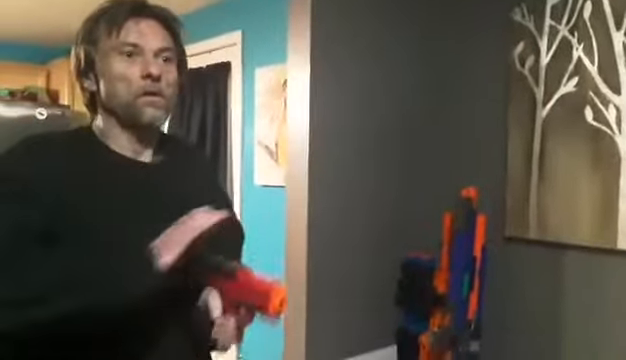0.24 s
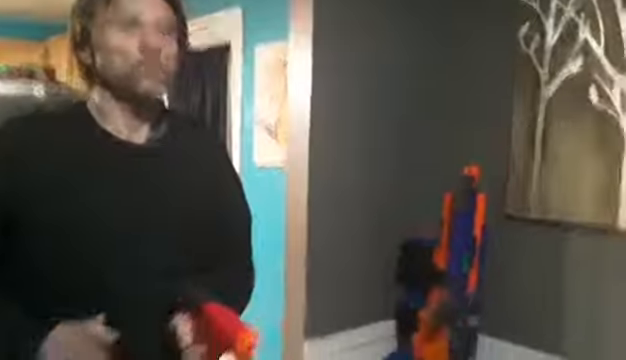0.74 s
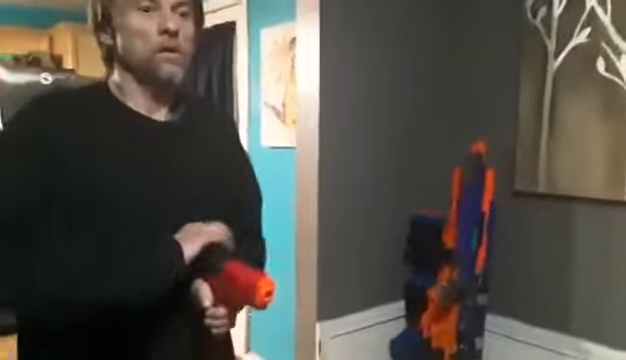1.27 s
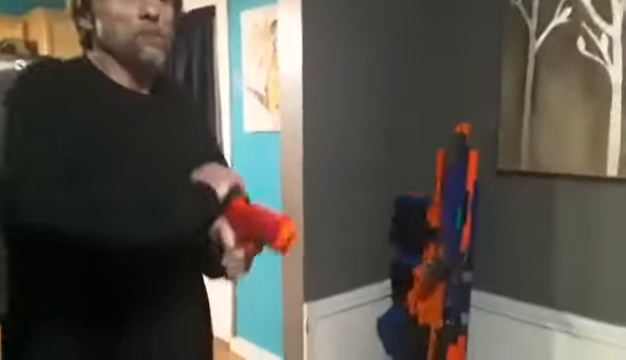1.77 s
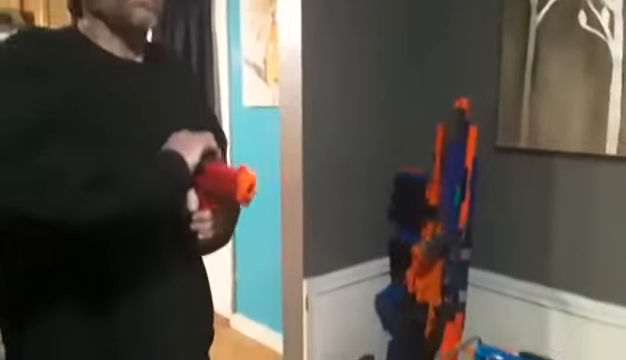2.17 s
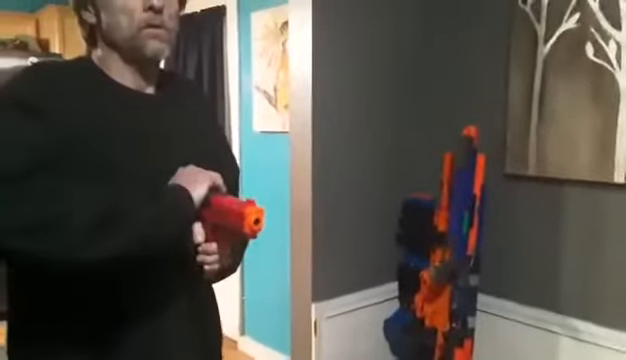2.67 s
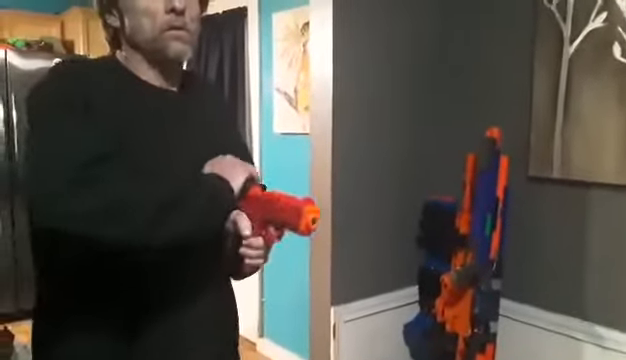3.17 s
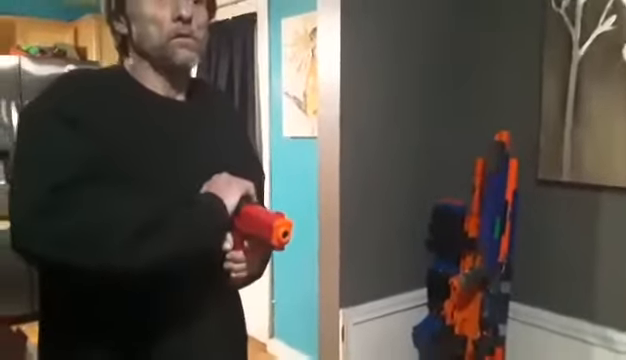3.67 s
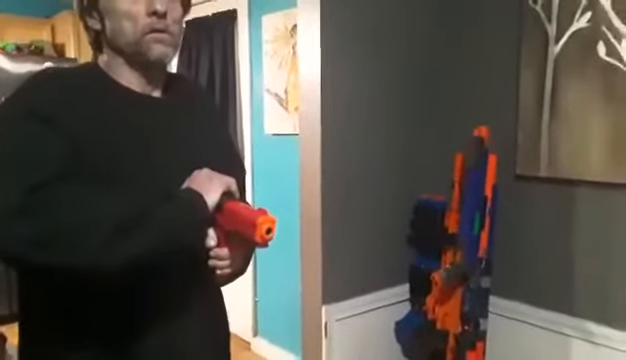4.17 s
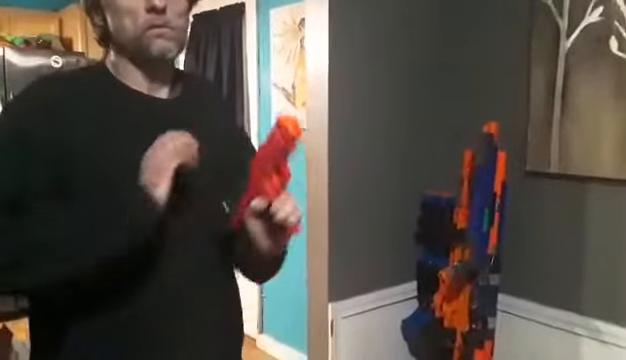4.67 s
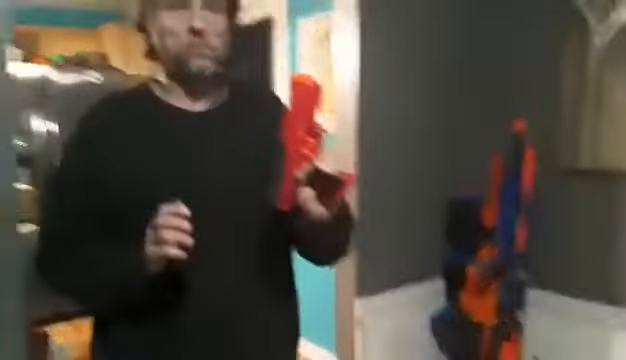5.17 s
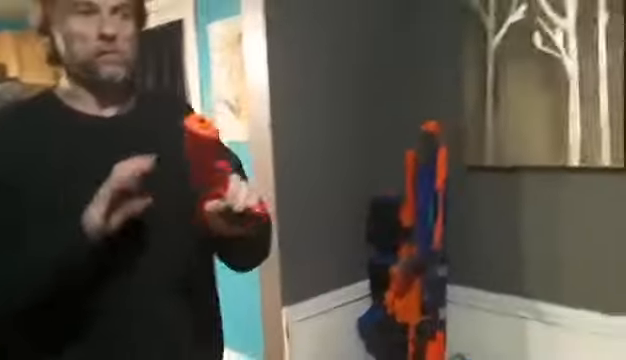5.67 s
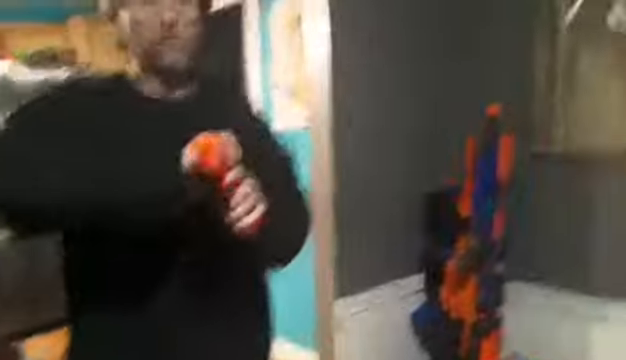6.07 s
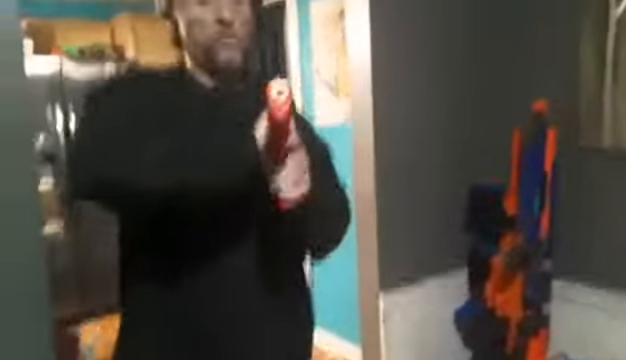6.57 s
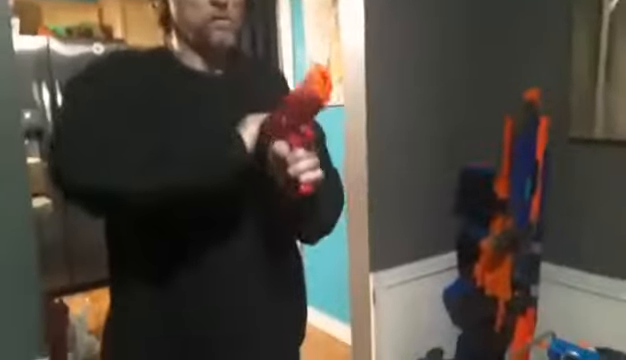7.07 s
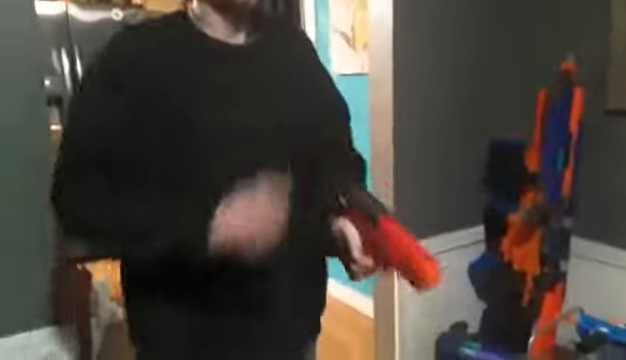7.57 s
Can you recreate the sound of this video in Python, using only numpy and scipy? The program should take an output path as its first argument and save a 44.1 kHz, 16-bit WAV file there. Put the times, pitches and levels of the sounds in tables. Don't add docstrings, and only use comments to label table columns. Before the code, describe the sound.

In a small, hard, lively room, a plastic dart pistol close to the microphones is cocked with a sharp double clack, then fires with a hollow pop and puff of air. It is cocked and fired twice more, darts thudding across the room. Later come dry finger ticks on the camera, more slide clacks and one very loud snap. A faint low hum swells and sinks.

```python
import sys
import numpy as np
from scipy import signal
from scipy.io import wavfile
from scipy.ndimage import uniform_filter1d

SR = 44100
rng = np.random.default_rng(int(sys.argv[2]) if len(sys.argv) > 2 else 0)


def pcm_store(signal):
    levels = np.round(np.clip(np.atleast_2d(signal), -1, 1) * 32767)
    wavfile.write(sys.argv[1], SR, levels.astype(np.int16).T)


def natural_amplitude(level_db):
    exponent = np.asarray(level_db, float) / 20
    return 10 ** exponent


N = 344862


def evened(x):
    return x / np.sqrt(np.mean(x ** 2) + 1e-20)


def read(points, hz):
    f, value = np.transpose(points)
    return np.interp(np.log(hz + 1), np.log(f + 1), value)


def add(mix, s, sound):
    part = mix[..., round(s * SR):][..., :sound.shape[-1]]
    part += sound[..., :part.shape[-1]]


def colour(points, tilt_db=0., modes=()):
    hz = np.abs(np.fft.fftfreq(4096, 1 / SR))
    db = read(points, hz) + tilt_db * np.log2(np.clip(hz, 300, 12000) / 3000)
    for f, width, top in modes:
        db = db + top / (1 + (2 * (hz - f) / width) ** 2)
    log_gain = np.log(natural_amplitude(np.maximum(db, -100)))
    h = np.fft.ifft(np.exp(np.conj(signal.hilbert(log_gain)))).real[:2048]
    return h / np.linalg.norm(h)


def resonate(x, hz, width):
    return signal.lfilter(*signal.iirpeak(hz, hz / width, SR), x)


def blow(db, tilt_db, ms, points, modes):
    t = np.arange(1200) / SR
    fade = np.exp(-t * 1000 / max(ms, .2)) * np.minimum(t / 0.0004, 1)
    contact = rng.standard_normal(1200) * fade
    contact[12] += .4 * np.linalg.norm(contact)
    body = colour(points, tilt_db, modes)
    sound = np.convolve(contact, body)
    around = np.pad(body, (12, len(sound) - len(body) - 12)) * np.linalg.norm(sound)
    return natural_amplitude(db) * np.array([sound, around]) / abs(sound).max()


# frequency in Hz, level in dB per Hz.
SHELL = [(88, -46.5), (150, -19), (327, -9), (659, -12), (828, -5), (2590, -4), (3710, -3), (11100, -15.5),
         (13000, -23.5), (14000, -55)]
POP_S = [.6186, 2.3758, 3.6876]
# pop in dB, air rush in dB, rush length in seconds,
# frequency in Hz below which the pop fades out.
SHOTS = [
    (-10.5, -10, 0.047, 54),
    (-5.5, -13, 0.055, 66),
    (-3, -9, 0.026, 240),
]
PIPE_DB = [.5, 2.5, 0.5, -4, -8, -14]
# frequency in Hz, level in dB per Hz.
RUSH = [(88, -50), (150, -20), (566, -20), (698, -8), (1330, -16.5), (3640, -10.5), (9950, -11),
        (11800, -28.5), (14000, -80)]
# frequency in Hz, width in Hz, height in dB.
PLUNGER = [(483, 68, 2.5), (1180, 220, 2), (3130, 610, 6), (4650, 160, 6), (8200, 130, 1.5)]


def shots():
    out = np.zeros((2, N))
    pipe_hz, pipe_width_hz = 714, 58
    for s, (pop_db, rush_db, length, low_hz) in zip(POP_S, SHOTS):
        t = np.arange(round(.022 * SR)) / SR
        catch = np.convolve(rng.standard_normal(len(t)), colour(SHELL, 1.2))[:len(t)]
        add(out[0], s - .0085, natural_amplitude(rush_db - 7.5) * catch * np.minimum(t / .004, 1) ** 2)

        u = np.arange(2000) / SR / .0004
        suck = -3.6 * u * np.exp(-u)
        pop = signal.lfilter(*signal.butter(2, low_hz, "high", fs=SR), suck)
        add(out[1], s + .0002, natural_amplitude(pop_db) * pop)

        t = np.arange(round((length + .06) * SR)) / SR
        gusts = natural_amplitude(3.9 * evened(uniform_filter1d(rng.standard_normal(len(t)), 160)))
        air = rng.standard_normal(len(t)) * gusts
        tube = np.zeros(len(t))
        for k, db in enumerate(PIPE_DB):
            tube += natural_amplitude(db) * resonate(air, (2 * k + 1) * pipe_hz, pipe_width_hz * (1 + k / 3))
        hiss = np.convolve(air, colour(RUSH, 0., PLUNGER))[:len(t)]
        fade_db = 298.5 * (length - 0.046)
        shape_db = fade_db * t / length - 1100 * np.maximum(t - length, 0)
        shape = natural_amplitude(shape_db) * np.minimum(t / 0.0015, 1)
        add(out[0], s + .002, natural_amplitude(rush_db) * shape * 0.5 * (evened(tube) + evened(hiss)))
    return out


# frequency in Hz, width in Hz, height in dB.
SHELL_MODES = [(815, 99, 5), (1262, 79, 7.5), (2370, 300, 0), (3040, 300, -0.5), (4870, 870, 4)]
# start in seconds, peak in dB, brightness in dB per octave.
CLACKS = [(0.014, -23, 3), (0.387, -75, -3), (0.908, -42.5, 1), (1.174, -54.5, -1.5), (1.592, -41.5, 0),
          (1.651, -40.5, -1.8), (1.932, -18, 9.5), (2.264, -46, -3.5), (2.89, -40, 1.3),
          (2.965, -38.5, -0.5), (3.16, -41, 0.2), (3.248, -35, 5.5), (3.266, -34.5, -0.5), (3.632, -45, 2),
          (6.303, -22.5, 1), (6.374, -19, 2), (7.01, -49.5, 3), (7.074, -44.5, -1.5), (7.142, -34, -1.5),
          (7.154, -14, 5.9), (7.17, -5.5, 5), (7.193, -16.5, 12.5), (7.507, -43.5, 6.5)]
# start in seconds, peak in dB, brightness in dB per octave, blow length in ms.
STOPS = [(0.0551, -17, -2.5, 1.2), (0.0591, -7, 2.5, 1.4), (1.6761, -33.5, -0.5, 5.6),
         (1.826, -36.5, 2.5, 7), (1.945, -29, -1, 2.9), (1.958, -12.5, 0.9, 3.2), (2.976, -50, 1, 1.3),
         (2.298, -39, 1.5, 2.4), (2.996, -33, 0.1, 2), (3.2841, -30, 1, 1.5), (6.409, -16.5, 0, 2.5),
         (6.4137, -11.5, 10.5, 1.6), (6.5713, -15.5, 6.5, 0.43), (6.581, -57, 6, 2.5), (7.59, -62, -3, 1.1)]
# start in seconds, length in seconds,
# level at start in dB, level at end in dB, brightness in dB per octave.
STROKES = [(0.006, 0.038, -36, -24, 3), (1.605, 0.051, -66, -54.5, 0), (1.911, 0.063, -49, -28.5, 0),
           (2.916, 0.083, -59.5, -72, 0.5), (3.249, 0.045, -55.5, -42.5, 0), (6.301, 0.1, -43.5, -42, 2.5),
           (7.154, 0.045, -46, -22, -0.7), (0.302, 0.28, -76.5, -63.5, -3.5)]


def slide():
    out = np.zeros((3, N))
    blows = [(*row, 2.5, -7.5) for row in CLACKS]
    blows += [(*row, 0.5) for row in STOPS]
    for k, (s, db, tilt_db, ms, facing_db) in enumerate(blows):
        hollow = 1 + 0.1334 * tilt_db
        modes = [(f, w, hollow * top) for f, w, top in SHELL_MODES]
        for f in np.exp(rng.uniform(np.log(700), np.log(10000), size=5)):
            modes.append((f, .06 * f, 4))
        sound, around = blow(db + 4.0, tilt_db, ms, SHELL, modes)
        add(out[k % 2], s - .001, around)
        add(out[2], s - .001, sound * natural_amplitude(facing_db))
    for s, length, start_db, end_db, tilt_db in STROKES:
        n = round(length * SR)
        slips_db = 8.8 * np.minimum(rng.exponential(1, n), 5)
        grit = rng.standard_normal(n) * natural_amplitude(slips_db)
        drag = evened(np.convolve(grit, colour(SHELL, tilt_db, SHELL_MODES))[:n])
        shape = natural_amplitude(np.linspace(start_db, end_db, n)) * np.minimum(np.arange(n) / 250, 1)
        add(out[1:], s, (drag * shape)[None])
    return out


# start in seconds, length in seconds, level in dB,
# frequency in Hz, width in Hz.
SPRING = (.2, .27, -65, 4200, 300)


def spring():
    out, (s, length, db, hz, width) = np.zeros(N), SPRING
    n = round(length * SR)
    whistle = evened(resonate(rng.standard_normal(n), hz, width))
    add(out, s, natural_amplitude(db) * whistle * np.hanning(n))
    return out


# start in seconds, peak in dB, brightness in dB per octave, blow length in ms.
THUDS = [
    (2.626, -25.5, -4.5, 1.9),
    (3.881, -11, -4, 4.4),
]
# frequency in Hz, level in dB per Hz.
TARGETS = [
    [(47, -44), (80, -14), (422, -1), (536, -14.5), (808, -10.5), (1480, -18), (2230, -27), (4270, -24),
     (11500, -36.5), (14000, -65)],
    [(35, -73.5), (60, -37.5), (381, -2.5), (1370, -14), (1570, -23.5), (1970, -16), (5370, -17.5),
     (9500, -34), (14000, -68.5)],
]
# frequency in Hz, width in Hz, height in dB.
TARGET_MODES = [
    [(132, 39, 3), (284, 66, 4.5), (910, 99, 1.5)],
    [(259, 62, 6.5), (362, 18, 3), (602.4, 56, 11)],
]


def darts():
    out = np.zeros((2, N))
    for (s, db, tilt_db, ms), points, modes in zip(THUDS, TARGETS, TARGET_MODES):
        add(out, s - .001, blow(db + 1.0, tilt_db + 5.0, ms, points, modes))
    return out


def direct(x, db):
    left = signal.lfilter([.45], [1, -.45], x) + .2 * np.roll(x, 11)
    right = natural_amplitude(4.5) * (np.roll(x, 4) + 0.026 * np.roll(x, 23))
    return natural_amplitude(db) * np.array([left, right])


# start in seconds,
# snap peak in dB, knock peak in dB, knock frequency in Hz, left-right balance in dB.
TICKS = [(5.125, -56, -54.5, 217.4, 19), (5.145, -38.5, -42.5, 151, 18.5), (5.172, -19, -22.5, 248, 34),
         (5.2219, -50.5, -52, 210, -22), (5.235, -44, -60, 151, 6), (5.6976, -37, -56, 396, 18),
         (5.7177, -40, -46, 150, -21), (5.745, -49.5, -53, 298, 20), (5.7626, -33.5, -52, 396, 23),
         (5.875, -65, -57, 228, 6), (6.124, -36.5, -52, 450, 4), (6.137, -21, -29, 180, -19),
         (6.1866, -28.5, -32, 364, 18), (6.6117, -32, -27.5, 494, -17)]


def fingers():
    out, t = np.zeros((2, N)), np.arange(700) / SR
    for s, snap_db, knock_db, hz, pan_db in TICKS:
        fizz_db = -54 + 0.32 * (snap_db + 39)
        fizz = resonate(rng.standard_normal(len(t)) * np.exp(-t / 0.0014), 4300, 4600)
        snap = np.sin(2 * np.pi * 1627 * t) * np.exp(-t / 0.00041)
        knock = np.sin(2 * np.pi * hz * t + 1.9) * t * hz * np.exp(-t * hz * 2.6)
        sound = natural_amplitude(snap_db + 6) * snap + natural_amplitude(fizz_db + 14) * fizz + natural_amplitude(knock_db + 23) * knock
        add(out, s + 0.00098, sound * natural_amplitude(np.minimum([[pan_db], [-pan_db]], 0)))
    return out


# middle in seconds, half length in seconds, level in dB.
RUBS = [
    (0.497, 0.13, -71),
    (6.52, 0.3, -57),
    (7.198, .6, -80.5),
]


def sleeves():
    t = np.arange(N) / SR
    rubs = np.zeros(N)
    for s, half, db in RUBS:
        rubs += natural_amplitude(db - 20 * ((t - s) / half) ** 2)
    return rubs * evened(resonate(rng.standard_normal((N, 2)).T, 9700, 6000))


# frequency in Hz, left-right likeness from -1 to 1.
SAME = [(60, .75), (200, .92), (370, .9), (670, .5), (1220, .2), (2240, 0), (7500, 0), (13600, -.15)]


def paired(frames, size):
    hz = np.fft.rfftfreq(size, 1 / SR)
    a, b, c, d = rng.standard_normal((frames, len(hz), 4)).T
    like = np.clip(read(SAME, hz), -1, 1)[:, None]
    left = a + 1j * b
    right = like * left + np.sqrt(1 - like ** 2) * (c + 1j * d)
    return hz, np.array([left, right])


# frequency in Hz, time to fall 60 dB in seconds.
ROOM = [(150, 0.32), (400, 0.31), (1040, 0.34), (2760, 0.36), (7280, 0.31), (14000, 0.24)]
# frequency in Hz, left-right difference in dB.
ROOM_LEAN = [(60, -0.5), (230, -2.5), (900, 0), (3510, -0.5), (13600, -7)]


def room(x, wet_db):
    hz, z = paired(320, 256)
    t = np.arange(z.shape[-1]) * 64 / SR
    lean_db = read(ROOM_LEAN, hz)[:, None] * np.array([.5, -.5])[:, None, None]
    wall_db = -1.5 * np.log2(np.maximum(hz / 3000, 1))[:, None]
    decay_db = -60 * t / read(ROOM, hz)[:, None]
    tail = signal.istft(z * natural_amplitude(lean_db + wall_db + decay_db), nperseg=256, noverlap=192)[1]
    i = np.arange(tail.shape[1])
    tail *= np.minimum(i / 200, 1)
    tail *= 1 + 0.85 * np.exp(-i / SR / 0.0095)
    tail *= natural_amplitude(wet_db) / np.sqrt((tail ** 2).sum() / 2)
    return signal.oaconvolve(x[None], tail, axes=1)[:, :N]


# time in seconds, level in dB.
GATE = [(0, -50), (.6, -55), (0.848, -59), (1.2, -68.5), (1.901, -62.5), (2.1, -47.5), (2.35, -51),
        (2.751, -61), (3.0, -70), (3.601, -65.5), (4.551, -67), (4.9, -66), (5.103, -53), (5.35, -53.5),
        (5.698, -51), (6.751, -49.5), (7.201, -53), (7.82, -57)]
# frequency in Hz, width in Hz, level in dB.
HUM = [(207.4, 59, 5.5), (396, 7.4, 3), (371, 11, -1), (298, 12, -16.5)]
# middle in seconds, half length in seconds, change in dB.
DUCKS = [
    (0., .35, -12.5),
    (6.488, 0.28, -18),
]
# frequency in Hz, level in dB per Hz.
AIR = [(24, -40), (40, -26), (81, -21), (143, -2.5), (321, -10.5), (363, -4.5), (739, -19), (1270, -20),
       (7050, -36), (12400, -40.5), (14000, -60)]


def background():
    hz, z = paired(N // 256 + 5, 1024)
    patches = rng.standard_normal(z.shape[:0:-1]).T
    patches_db = 1.3 * evened(uniform_filter1d(uniform_filter1d(patches, 8, 0), 12, 1))
    white = signal.istft(z * natural_amplitude(patches_db), nperseg=1024, noverlap=768)[1][:, :N]
    air_gain = natural_amplitude(read(AIR, hz)[:, None] + patches_db)
    air = evened(signal.istft(z * air_gain, nperseg=1024, noverlap=768)[1][:, :N])
    hum = np.zeros((2, N))
    for f, width, db in HUM:
        line = resonate(resonate(resonate(white, f, 3 * width), f, width), f, width)
        hum += natural_amplitude(db) * evened(line)

    s, gate_db = np.transpose(GATE)
    t = np.arange(N) / SR
    air_db = np.interp(t, s, gate_db)
    late_db = np.interp(t - .15, s, gate_db)
    hum_db = -61.5 + 1.3 * (np.minimum(air_db, late_db) + 55.5)
    for at, half, db in DUCKS:
        hum_db = hum_db + db * np.maximum(1 - abs(t - at) / half, 0)
    bass = signal.sosfiltfilt(signal.butter(3, 175, fs=SR, output="sos"), air)
    air = air - bass * (1 - natural_amplitude(np.minimum(.8 * (air_db + 55), 0)))
    return natural_amplitude(hum_db) * evened(hum) + natural_amplitude(air_db) * air


def scene():
    (air, pop), (here, there, near), foam = shots(), slide(), darts()
    tails = room(air + natural_amplitude(-7.5) * pop, 1.4) + room(here + spring(), 2.4)
    tails = tails + room(there, 6.0) + room(foam[1], 8.4)
    straight = direct(air, -1.5) + direct(pop, -1.9) + direct(near, -1.4) + direct(foam[0], -8.5)
    return tails + straight + fingers() + sleeves() + background()


def band_limit(x):
    return signal.sosfilt(signal.butter(12, 14250, fs=SR, output="sos"), x)


def record(dry):
    heard = signal.lfilter(*signal.butter(1, 40, "high", fs=SR), dry)
    heard = .9 * np.tanh(heard / .9)
    heard = signal.sosfilt(signal.cheby1(10, 1, 13300, fs=SR, output="sos"), heard)
    return band_limit(heard)


dry = scene()
out = record(dry)
pcm_store(out)
```